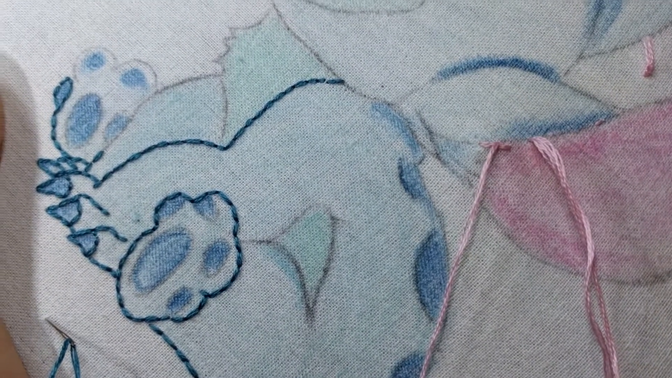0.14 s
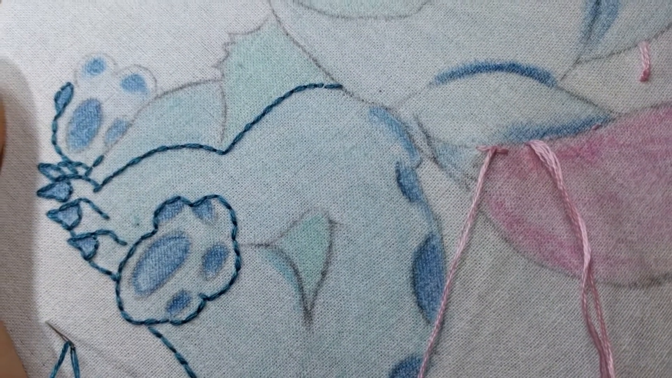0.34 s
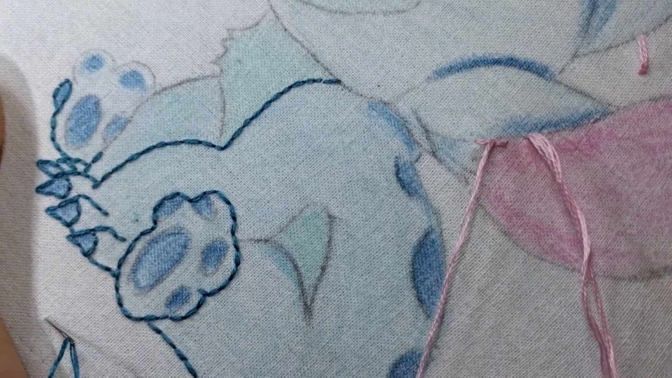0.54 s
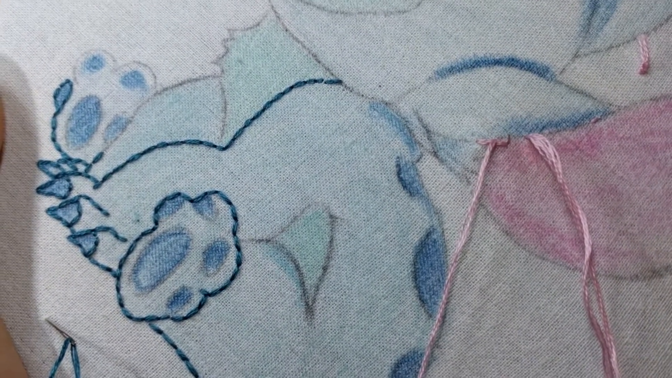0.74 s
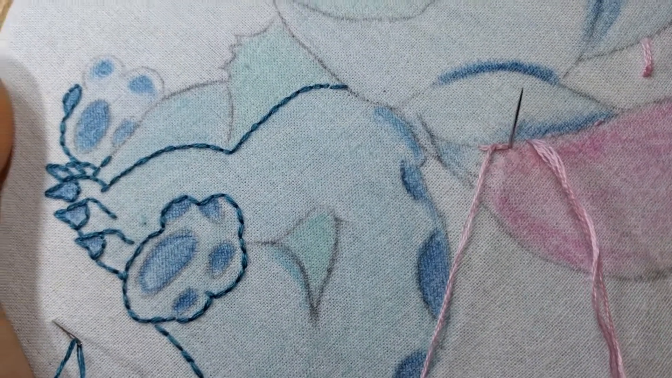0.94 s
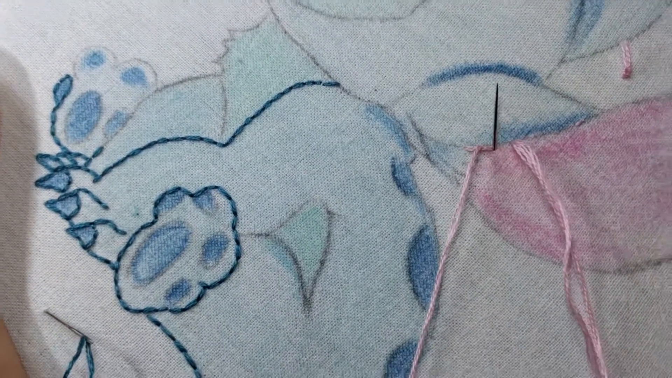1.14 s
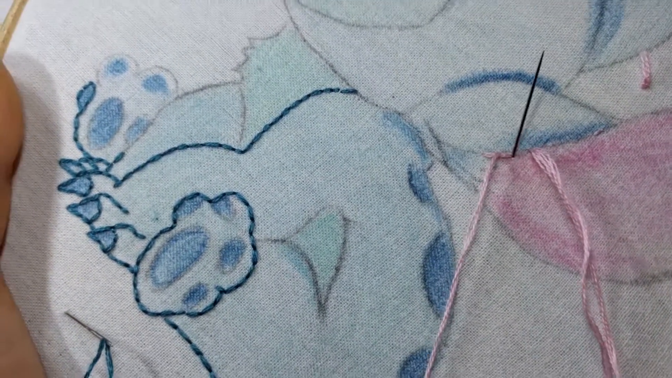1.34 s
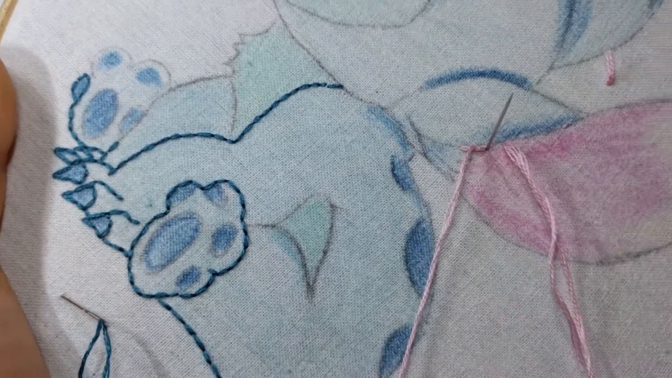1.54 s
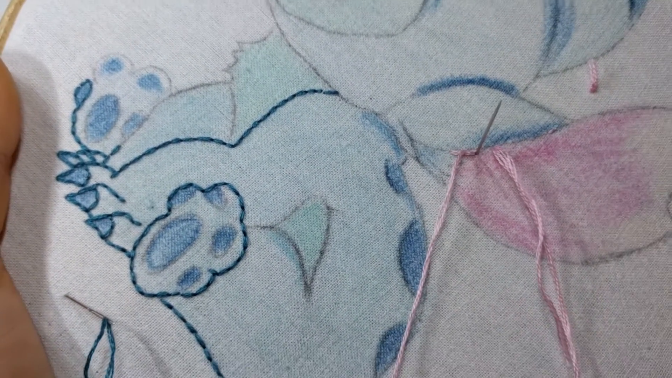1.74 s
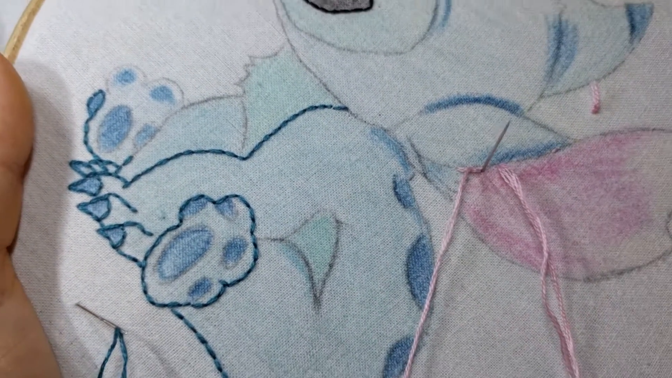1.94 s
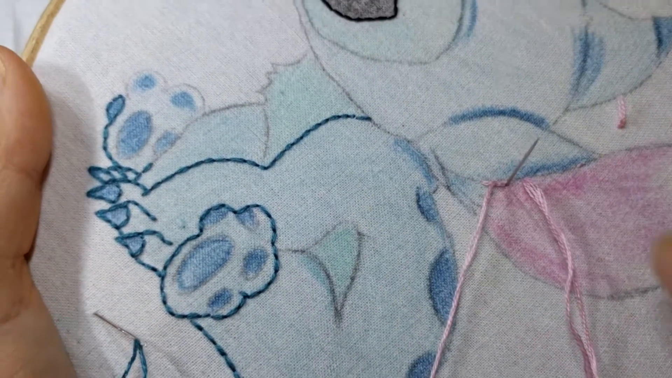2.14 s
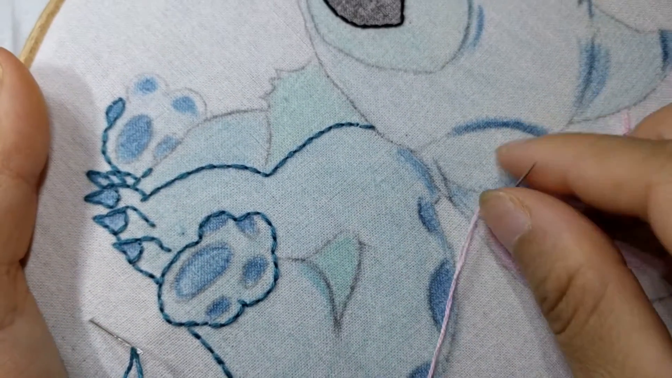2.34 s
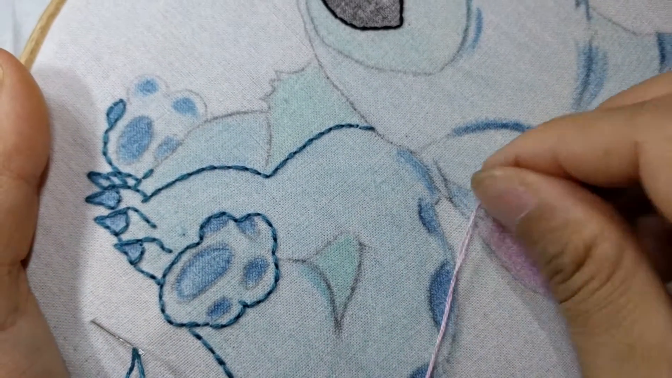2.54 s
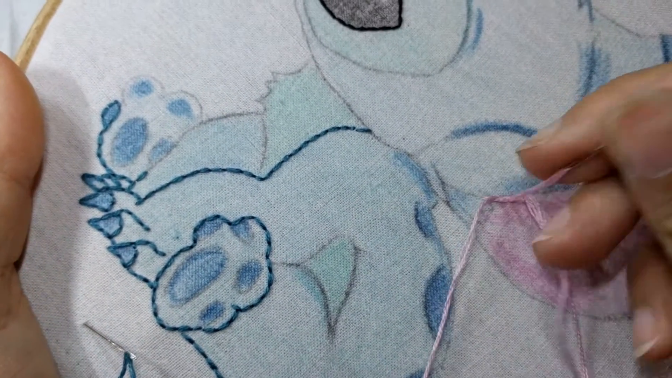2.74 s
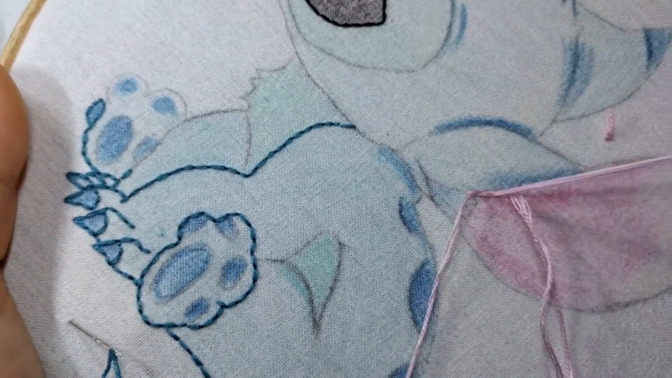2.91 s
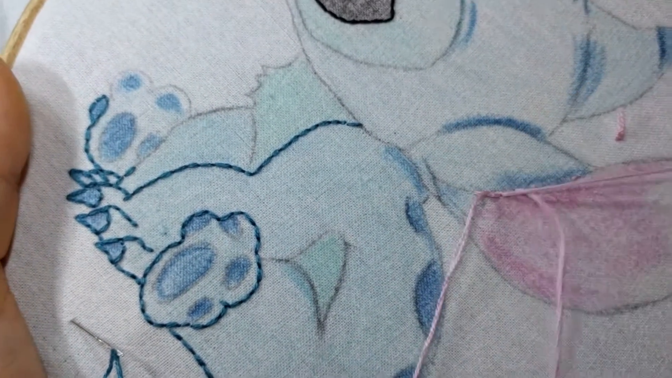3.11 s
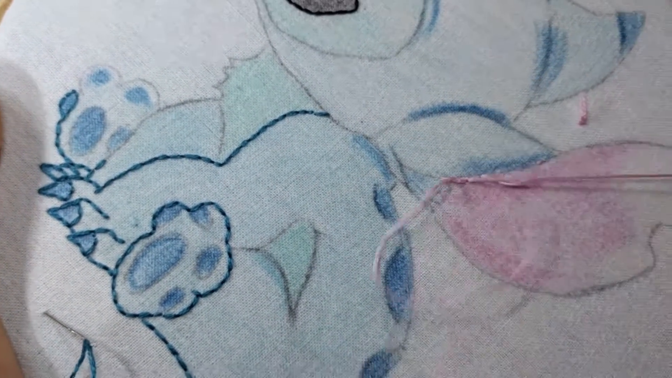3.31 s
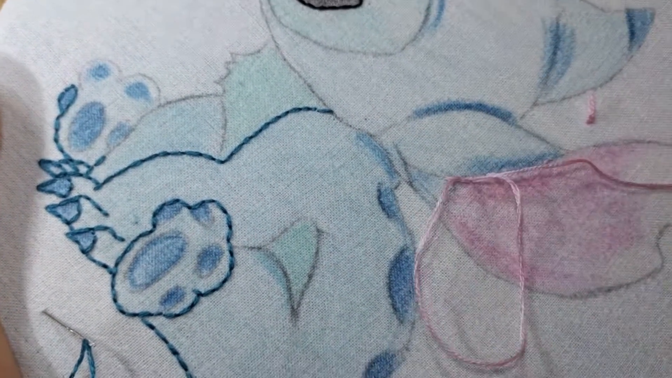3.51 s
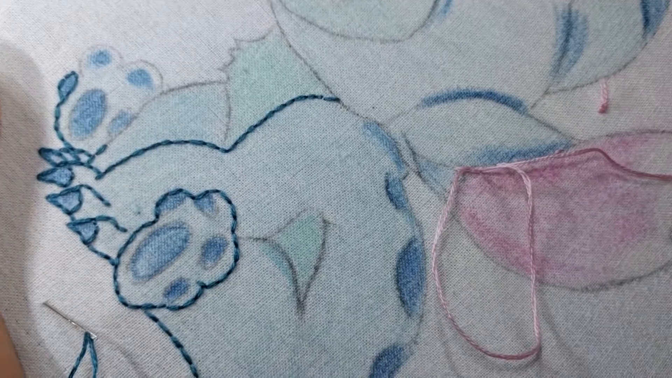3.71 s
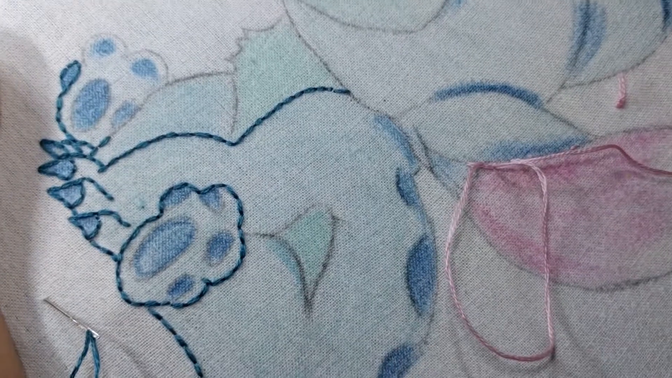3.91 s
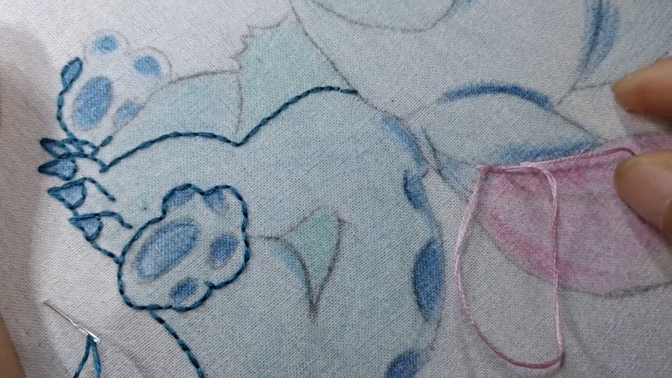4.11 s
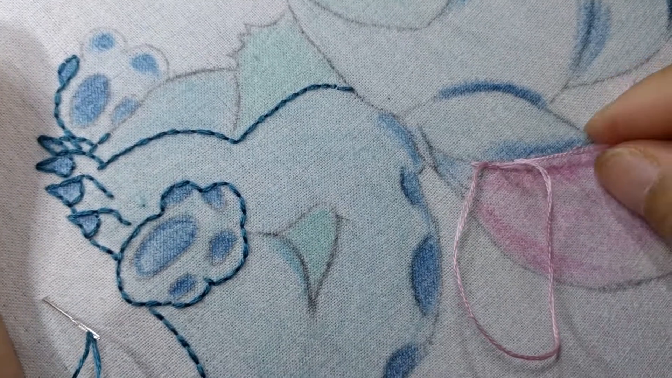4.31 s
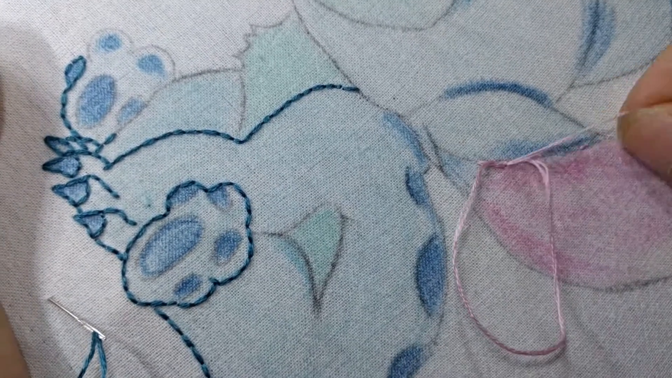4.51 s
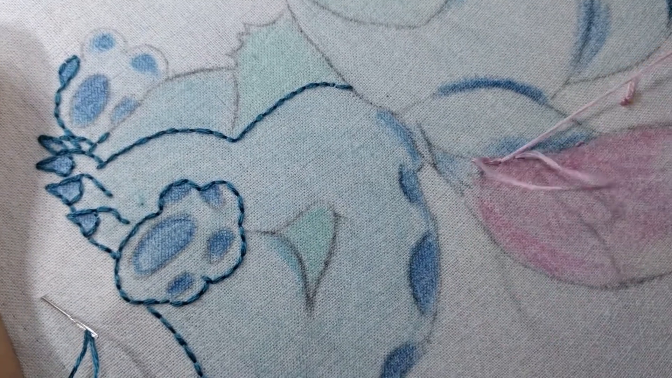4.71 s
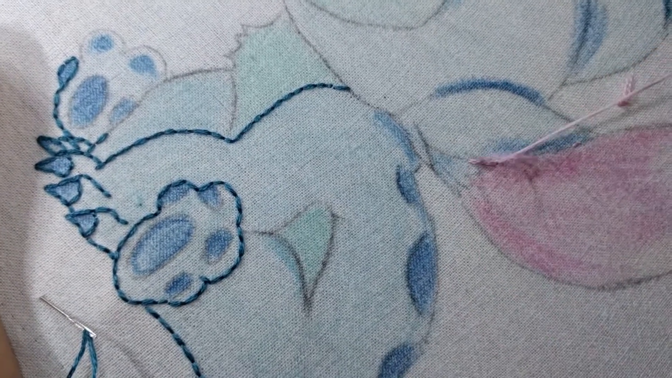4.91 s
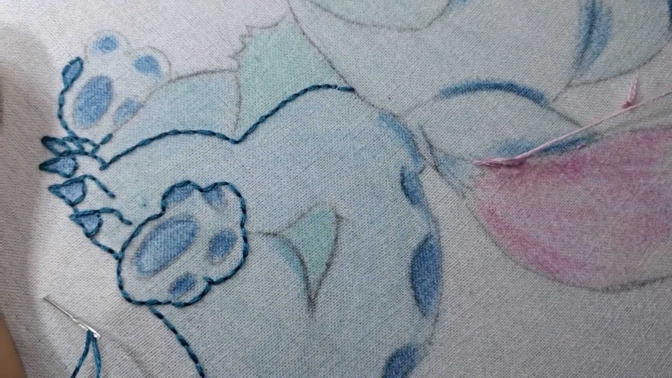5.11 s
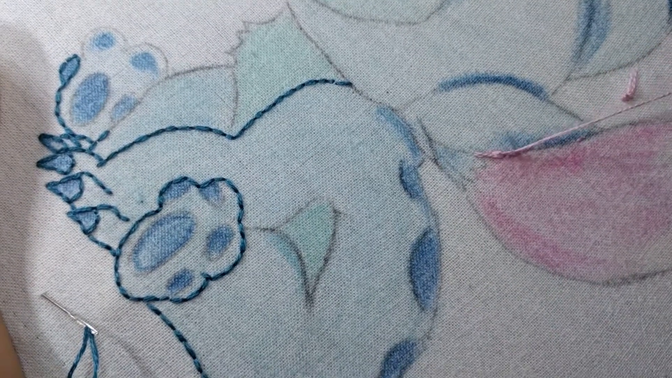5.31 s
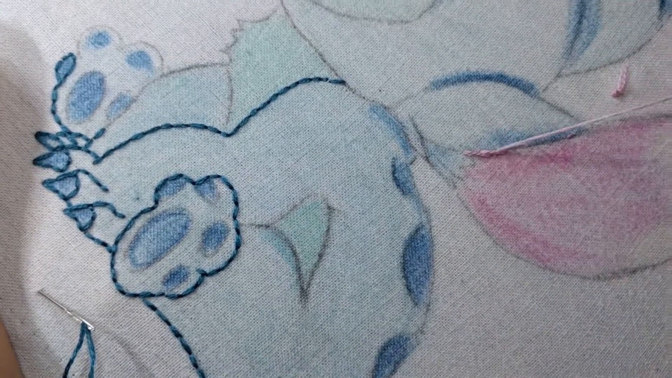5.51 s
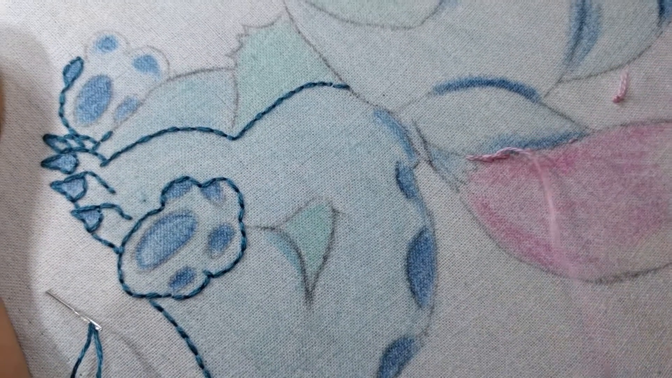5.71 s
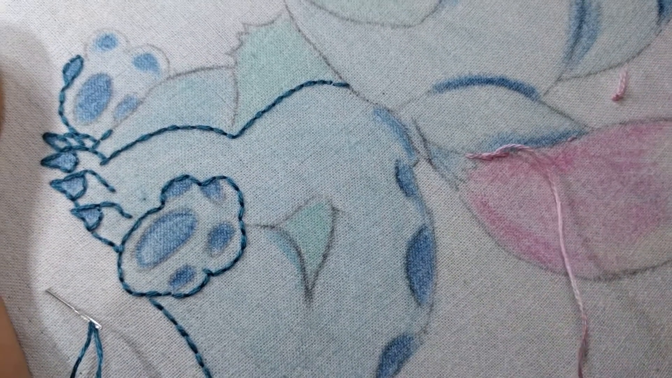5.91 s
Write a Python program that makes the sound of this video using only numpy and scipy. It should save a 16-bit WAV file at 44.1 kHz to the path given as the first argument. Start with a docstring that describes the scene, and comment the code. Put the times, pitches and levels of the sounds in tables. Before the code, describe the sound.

Hand embroidery is heard from very close, over a steady low room rumble, faint microphone hiss and a thin electrical sizzle. At 0.3 seconds a needle taps taut cotton. It pricks through with a sharp tick at about 1.1 seconds, scraping faintly until 1.8. Fingers rub and grip from 2.3 seconds, and at 2.65 the needle's eye pops through with a soft thump and a tiny rip. From 2.7 to 3.4 seconds thread is drawn through, rasping and hissing while the cloth thrums like a slack drum; it jerks tight with a brief buzz around 3 seconds, the loudest moment. Slack thread brushes the fabric near 3.7, and fingers shuffle lightly around 4.3. A second, smoother pull runs from 4.6 to 5.25 seconds, droning softly and fading, dotted with fibre ticks. One small click follows at about 6 seconds.

```python
"""Embroidery floss drawn in two pulls through cotton stretched in a hoop, heard from very close.
Its twist thrums the cloth like a slack drum, while its fibres rasp and hiss in the hole.
Ahead of the pulls, a needle pricks the cloth, scrapes through and pops its eye past the weave.
Fingers grip and shuffle in between, over a bed of low room rumble, microphone hiss and mains sizzle."""
import sys
import numpy as np
from scipy import signal
from scipy.fft import rfft, irfft, next_fast_len
from scipy.io import wavfile
from scipy.ndimage import uniform_filter1d, map_coordinates

SR = 44100
rng = np.random.default_rng(int(sys.argv[2]) if len(sys.argv) > 2 else 0)


def waveform_to_disk(signal):
    """Save audio, clipped to [-1, 1], as 16-bit WAV at the path in sys.argv[1]."""
    frames = np.transpose(np.atleast_2d(signal))
    scaled = np.clip(frames, -1, 1) * 32767
    samples = np.round(scaled).astype(np.int16)
    wavfile.write(sys.argv[1], SR, samples)


N = 266972
TIME = np.arange(N) / SR

# drum modes of the stretched cloth: f/Hz, level/dB, t60/s
CLOTH_MODES = [(61.8, 10, 0.12), (86, -2, 0.11), (111, 4.5, 0.12), (179.3, -2, 0.24), (236, -8, 0.22),
               (274, -19, 0.11)]


def floss():
    """Two pulls: the first runs doubled, jerks tight and trails off single; the second is one stroke."""
    # hand strokes by name: start/s, end/s, attack/s, release/s, ease in/dB, ease out/dB,
    # thrum/dB, rasp/dB, hiss/dB, evenness of the tugs/0-1
    strokes = { "doubled": (2.69, 2.965, .145, .003, 10.5, 8, -37.5, -37, -46.8, .15),
               "jerk": (2.975, 3.098, .012, .125, 3.5, 7, -29.5, -35.8, -46.1, .6),
               "single": (3.122, 3.375, .1, .045, 3.5, 13, -41.5, -45.2, -48.2, .15),
               "second": (4.556, 5.25, .14, .31, 8.5, 16, -35.2, -46.7, -56, .55), }
    # rasp resonances of floss and cloth, set by the free length of floss: f/Hz, width/Hz, level/dB
    doubled_rasp = [(190, 50, 0), (240, 40, -1), (345, 50, -2), (395, 55, 1), (470, 50, -6),
                    (620, 110, -15.5), (755, 35, -13), (890, 120, -16.5), (1105, 120, -15),
                    (1350, 70, -17.5), (1475, 130, -20.5), (1920, 150, -23)]
    jerk_rasp = [(345, 60, -2), (420, 80, -2), (505, 60, -4), (630, 90, -12), (810, 90, -11),
                 (930, 120, -15.5), (1160, 130, -13.5), (1450, 300, -25.5), (1920, 120, -27)]
    single_rasp = [(335, 45, -4), (400, 55, -1), (540, 110, -7), (720, 80, -14), (955, 110, -11.5),
                   (1120, 110, -14), (1335, 90, -10.5), (1470, 90, -16), (1680, 70, -20), (1910, 110, -20)]
    second_rasp = [(350, 45, -3), (405, 70, 2.5), (480, 55, .5), (630, 110, -12.5), (756, 26, -6.5),
                   (810, 28, -7.5), (865, 30, -11.5), (958, 32, -12), (1042, 30, -11.5), (1123, 90, -12),
                   (1390, 80, -15), (1500, 120, -15), (1880, 220, -20.5)]
    # resonances that colour the hiss: f/Hz, width/Hz, level/dB
    doubled_hiss = [(2440, 270, 1), (2790, 290, 1), (3400, 220, 1.5), (4000, 230, 4), (5260, 600, -5),
                    (6300, 590, .5), (8900, 600, -1), (10200, 850, 1), (12000, 1100, -3),
                    (14600, 1200, -2.5)]
    single_hiss = [(2550, 470, -1), (3430, 150, -0.5), (4050, 250, 4), (5200, 950, -1.5), (7160, 230, 1),
                   (8240, 300, 1), (8950, 450, 2), (10250, 790, -1), (13300, 500, 0), (14700, 1000, -6)]
    second_hiss = [(2600, 300, .5), (3480, 260, 1.5), (4030, 260, 4.5), (4850, 150, 3), (5380, 220, 3),
                   (6110, 220, 3.5), (7230, 220, 4.5), (8830, 380, 4), (9850, 340, 0), (13700, 600, 2.5),
                   (14800, 700, -2)]
    doubled = pull(strokes["doubled"], doubled_rasp, doubled_hiss, tilt_db=-11, twist_db=1.3, ring_db=0)
    jerk = pull(strokes["jerk"], jerk_rasp, doubled_hiss, tilt_db=-20, twist_db=2.2, ring_db=0) + buzz()
    single = pull(strokes["single"], single_rasp, single_hiss, tilt_db=-22, twist_db=1, ring_db=-1.5)
    second = pull(strokes["second"], second_rasp, second_hiss, tilt_db=-1.5, twist_db=2, ring_db=-2.5)
    return hollow(doubled + jerk + single + second)


def pull(stroke, rasp_peaks, hiss_peaks, tilt_db, twist_db, ring_db):
    """Each twist tugs at the cloth and presses the fibres harder against the weave."""
    # floss speed through the hole in each pull: t/s, rate/(twists per s)
    first_speed = [(2.70, 62), (2.85, 102), (2.94, 93), (2.99, 66), (3.04, 122), (3.08, 100), (3.13, 52),
                   (3.2, 108), (3.38, 85)]
    second_speed = [(4.56, 61), (4.63, 118), (4.72, 96), (4.87, 93), (4.95, 82), (5.03, 105), (5.08, 70),
                    (5.17, 57)]
    # thick spots in the floss that drag harder: t/s, boost/dB
    slubs = [(3.318, 2), (5.172, 6)]
    *gesture, thrum_db, rasp_db, hiss_db, evenness = stroke
    sliding, effort_db = effort(*gesture)
    slub_db = sum(db * swell(s, rise=.017, fall=.017) for s, db in slubs)
    twist_hz = np.interp(TIME, *np.transpose(first_speed + second_speed))
    turns = np.cumsum(twist_hz * np.exp(.0506 * drift(70))) / SR
    pressure = from_db(twist_db * np.cos(2 * np.pi * turns) + .77 * drift(60))
    # a gentler pull tugs more evenly, with a rounder tone
    even = np.clip(evenness * from_db(-.35 * effort_db), 0, .95)
    drum = thrum(turns, pressure, even, tilt_db + .9 * effort_db)
    body = from_db(thrum_db + .24 * effort_db) * drum
    grit = from_db(rasp_db + 1.05 * effort_db + .6 * slub_db) * rasp(pressure, rasp_peaks)
    air = from_db(hiss_db + effort_db + slub_db) * hiss(pressure, hiss_peaks, ring_db)
    return sliding * (body + snag() * (grit + air))


def effort(start, end, attack, release, ease_in_db, ease_out_db, edge_s=.02):
    """The hand leans in, holds and eases off: when the floss slides (0-1), and how hard (dB)."""
    sliding = np.clip(1 + np.minimum(TIME - start, end - TIME) / edge_s, 0, 1)
    easing_in = np.clip(1 - (TIME - start) / attack, 0, 1)
    easing_out = np.clip(1 - (end - TIME) / release, 0, 1)
    return sliding, -ease_in_db * easing_in - ease_out_db * easing_out


def thrum(turns, pressure, even, tilt_db):
    """Even tugs make the cloth drone at the twist rate; uneven ones shake all its modes."""
    drone = steady(ring(harmonics(turns, tilt_db, count=4), CLOTH_MODES), seconds=.045)
    shake = ring(pressure * slips(per_s=3500, spread_db=2), CLOTH_MODES)
    shake = signal.sosfilt(signal.butter(3, 330, fs=SR, output="sos"), shake)
    return np.sqrt(even) * drone + np.sqrt(1 - even) * steady(shake, seconds=.017)


def rasp(pressure, peaks):
    """Coarse slips ring the floss and cloth."""
    grains = pressure * slips(per_s=2700, spread_db=2)
    return steady(rolling_resonances(grains, peaks), seconds=.08)


def hiss(pressure, peaks, ring_db):
    """Fine slips make a broad hiss with a resonant layer on top."""
    # spectrum of the sliding fibres: f/Hz, density/dB
    spectrum = [(900, -30), (1700, -14), (2250, -7), (2600, 0), (4500, 0), (7500, -2), (11500, -1),
                (14800, 1), (16000, -6)]
    fine = pressure * slips(per_s=9000, spread_db=3.3)
    spiky = pressure * slips(per_s=6400, spread_db=6)
    return rms_one(colour(fine, spectrum) + from_db(ring_db) * rolling_resonances(spiky, peaks))


def rolling_resonances(x, peaks, waver_db=1.6, stray_share=.008, per_s=14):
    """As the floss rolls in the hole, its resonances waver one by one and stray in pitch together."""
    wavering = sum(resonate(x, [peak]) * from_db(waver_db * drift(20)) for peak in peaks)
    position = np.arange(N) + np.cumsum(stray_share * drift(per_s))
    return rms_one(map_coordinates(wavering, [position], order=3, mode="mirror"))


def snag(at_s=2.969, width_s=.004, depth_db=-7):
    """The floss catches for an instant and its friction ducks."""
    return from_db(depth_db * swell(at_s, width_s, width_s))


def buzz(jitter=.05, rough_db=2.5, sag_octaves_per_s=3.5):
    """Jerked tight, the floss is bowed by the weave in rough bursts that sag as the tension gives."""
    # stick-slip bursts: t/s, rise/s, fall/s, f/Hz, level/dB
    bursts = [(2.986, .011, .027, 445, -30.3), (3.046, .018, .014, 450, -36.5), (3.1, .015, .016, 350, -40),
              (3.146, .01, .03, 410, -39.5)]
    out = 0
    for s, rise, fall, hz, db in bursts:
        sag = 2 ** np.clip(sag_octaves_per_s * (s - TIME), -1, 1)
        cycles = np.cumsum(hz * sag * np.exp(jitter * drift(220))) / SR
        tone = harmonics(cycles, tilt_db=-19, count=3) * from_db(rough_db * drift(170))
        out += from_db(db) * swell(s, rise, fall) * rms_one(tone)
    return out


def hollow(x):
    """Notch out the pitches at which the stretched cloth radiates poorly."""
    # dead spots of the cloth: f/Hz, width/Hz, depth/dB
    nulls = [(302, 28, -6.5), (560, 50, -3), (1272, 110, -14), (1750, 110, -5), (2200, 170, -2.5),
             (4580, 250, -2), (6950, 200, -3), (9350, 200, -2.5), (10950, 300, -3)]
    for hz, width, db in nulls:
        band = signal.lfilter(*signal.iirpeak(hz, hz / width, fs=SR), x)
        x = x - (1 - from_db(db)) * band
    return x


def needle_slide():
    """The shaft rubs through the weave in short pushes: a midrange scrape under a bright hiss."""
    # pushes: t/s, rise/s, fall/s, scrape/dB, hiss/dB
    pushes = [(.928, .062, .045, -63.3, -55), (1.085, .075, .025, -64, -54.5),
              (1.118, .016, .03, -65, -55.5), (1.272, .055, .055, -64.5, -55.7),
              (1.395, .05, .1, -63, -57.3), (1.54, .06, .1, -64, -57.3), (1.70, .09, .07, -64.3, -56.2),
              (1.8, .06, .06, -64.7, -62)]
    # spectra of steel on cotton: f/Hz, density/dB
    scrape_colour = [(400, -6), (900, 2.5), (1600, 1), (2400, 1), (3100, 1), (3900, -6), (7000, -24)]
    hiss_colour = [(2500, -16), (4200, -7), (8000, -5.5), (11500, -4), (14000, -0.5), (16000, 1.5)]
    return rub(pushes, scrape_colour, hiss_colour)


def snaps(tick_db=7):
    """A thread slips off the steel: a tick and crack, a thump in the cloth, a ping of the needle."""
    # snaps past threads: t/s, crack/dB, t60/s, thump/dB, ping/dB
    hits = [(0.302, -43, 0.009, -82, -75), (1.0571, -39, 0.006, -72, -47), (1.0586, -34.3, .014, -66, -47),
            (2.6578, -43.5, .008, -62, -64), (6.025, -46, .009, -76, -62)]
    # spectrum of the crack: f/Hz, density/dB
    crack_colour = [(300, -12), (1200, -3), (2500, 0), (4500, -3), (7000, 1.5), (9500, 3.5), (12000, 4.5),
                    (14800, 4.5), (16000, -2)]
    # modes of the needle: f/Hz, level/dB, t60/s
    needle_modes = [(2350, 1, .007), (2990, 0, 0.013), (5250, 4, 0.016), (5970, -5, 0.012),
                    (9570, 5, 0.013), (10450, 12, 0.018), (11500, 4, .012)]
    burst, tick, thump, ping = np.zeros((4, N))
    for s, crack_db, t60, thump_db, ping_db in hits:
        at = round(s * SR)
        burst[at:] += from_db(crack_db - 60 * np.minimum(TIME[:N - at] / t60, 10))
        tick[at], thump[at], ping[at] = from_db([crack_db + tick_db, thump_db, ping_db])
    crack = colour(tick + burst * rng.standard_normal(N), crack_colour)
    return crack + ring(thump, CLOTH_MODES) + ring(ping, needle_modes)


def taps():
    """The needle's tip, later a fingertip, taps a short dry ring out of the taut cloth."""
    # contacts: t/s, level/dB
    hits = [(.3024, -48), (4.239, -58)]
    # modes of the tapped cloth: f/Hz, level/dB, t60/s
    modes = [(580, 1, .012), (830, -1, .014), (1100, 0, .012), (1500, 1.5, .014), (1900, -4, .014),
             (2850, -8, .01), (3250, -8, .012)]
    force = np.zeros(N)
    for s, db in hits:
        force[round(s * SR)] = from_db(db)
    return ring(force, modes)


def bumps(knock_db=35, ring_db=-5.5):
    """Soft pushes thump the cloth; quick ones also knock and ring its higher modes."""
    # tip and eye break through, the floss jerks, a finger lands: t/s, push/dB, contact/s
    pushes = [(1.0586, -51, .0008), (2.6399, -32.5, 0.0083), (2.6577, -31.8, 0.00084), (2.758, -36, .007),
              (2.9748, -36.5, 0.004), (2.990, -35.5, .004), (3.068, -34.5, .006), (3.098, -35.5, .006),
              (3.298, -44, .007), (4.2383, -54, .0009)]
    # higher modes of the cloth: f/Hz, level/dB, t60/s
    high_modes = [(335, 2, .11), (395, -3, .1), (490, -5, .06), (756, -10, .05), (945, -7, .04),
                  (1116, -11, .04)]
    force = np.zeros(N)
    for s, push_db, contact in pushes:
        push = np.maximum(1 - np.abs(2 * (TIME - s) / contact - 1), 0)
        force += from_db(push_db) * push / push.sum()
    knock = resonate(force, [(230, 110, 3), (359, 180, 0), (900, 850, -4.5), (3200, 4400, -10)])
    thump = ring(force, CLOTH_MODES)
    return thump + from_db(knock_db) * knock + from_db(ring_db) * ring(force, high_modes)


def creaks():
    """The shaft creaks as it slides on through the hole."""
    # creaks: t/s, rise/s, fall/s, level/dB
    bursts = [(1.083, .005, .012, -60), (1.111, .004, .004, -56), (1.121, .005, .007, -56)]
    # their resonances: f/Hz, width/Hz, level/dB
    peaks = [(1750, 700, -11), (2400, 400, -8), (3130, 300, 3), (7300, 1200, -9)]
    return crackle(bursts, peaks, per_s=900)


def rip():
    """Fibres tear crisply as the eye bursts through."""
    # the tear: t/s, rise/s, fall/s, level/dB
    bursts = [(2.658, .0015, .009, -50)]
    # its resonances: f/Hz, width/Hz, level/dB
    peaks = [(1550, 400, -1), (2500, 700, -2), (3300, 500, -2), (4100, 500, 2)]
    return crackle(bursts, peaks, per_s=2500)


def catches(rise_s=.001, fall_s=.0022):
    """Single fibres catch in the weave and let go with a tick."""
    # catches: t/s, level/dB
    ticks = [(2.3224, -55), (2.838, -45), (3.553, -59), (4.653, -55), (4.865, -52), (4.9925, -55),
             (5.013, -55.5), (5.0914, -53), (5.4004, -60.5), (5.7215, -62)]
    # their spectrum: f/Hz, density/dB
    spectrum = [(1200, -10), (2800, 1), (5000, 0), (9000, 0), (15000, -5)]
    return rub([(s, rise_s, fall_s, db) for s, db in ticks], spectrum)


def handling():
    """Fingers grip needle and floss and shuffle dully on the cloth; slack floss brushes over it."""
    # light rubs: t/s, rise/s, fall/s, level/dB
    grips = [(2.322, .008, .025, -55.5), (2.375, .03, .13, -58), (2.592, .045, .03, -53),
             (2.648, .03, .035, -49), (4.21, .06, .07, -62.5), (4.38, .025, .06, -61),
             (4.555, .032, .07, -56)]
    shuffles = [(2.35, .03, .04, -64), (4.25, .025, .025, -63)]
    brushes = [(3.38, .015, .025, -55), (3.52, .15, .1, -66), (3.68, .052, .028, -52.8)]
    # their spectra: f/Hz, density/dB
    grip_colour = [(900, 0), (1600, -4.5), (3000, -5.5), (4000, -2), (5500, -6), (9000, -5), (12500, -4),
                   (16000, 0)]
    shuffle_colour = [(300, -12), (600, -6), (900, 0), (1100, -4), (1400, -14), (3000, -26), (6000, -44)]
    brush_colour = [(1500, -28), (4500, -11), (8000, -11), (11500, -4.5), (14500, 0), (16000, 0)]
    return rub(grips, grip_colour) + rub(shuffles, shuffle_colour) + rub(brushes, brush_colour)


def room_tone(rumble_db=-48.5, hiss_db=-65.9):
    """Steady rumble in a few room modes, with the microphone's faint hiss above it."""
    # room modes: f/Hz, width/Hz, level/dB
    modes = [(69, 37, -4), (130.5, 42, -5), (229.3, 31, -3), (486.4, 20.4, -1.5), (810, 60, -11),
             (960, 100, -7)]
    # spectra of room and microphone noise: f/Hz, density/dB
    rumble_colour = [(15, -55), (25, -31), (39, -2), (70, -3), (128, -4), (188, -11), (226, -9),
                     (326, -15.5), (391, -20), (445, -22), (479, -18), (642, -25.5), (2000, -40),
                     (2600, -77), (4400, -120)]
    mic_colour = [(1200, -11), (2400, -4), (4300, -4.8), (7000, -7.5), (11000, -7.6), (13000, -5),
                  (15000, -4), (16000, -8)]
    air, circuit = rng.standard_normal((2, N))
    rumble = rms_one(colour(air + resonate(air, modes), rumble_colour))
    return from_db(rumble_db) * rumble + from_db(hiss_db) * colour(circuit, mic_colour)


def sizzle(mains_hz=50):
    """A thin, very high electrical hiss flares twice in every mains cycle."""
    # flares: t in the cycle/s, half length/s, level/dB
    flares = [(.0012, .00105, -65.5), (.0184, .00078, -64)]
    # their spectrum: f/Hz, density/dB
    spectrum = [(6000, -22), (10500, -16), (12500, -2), (14000, 0), (15200, 0), (16000, -6)]
    level = 0
    for s, half, db in flares:
        offset_s = (((TIME - s) * mains_hz + .5) % 1 - .5) / mains_hz
        level += from_db(db) * np.exp(-(offset_s / half) ** 2)
    return level * colour(rng.standard_normal(N), spectrum)


def rub(strokes, *spectra):
    """Light sliding on cotton: swells of fine grains, one spectrum for each level column."""
    power = sum(np.outer(from_db(dbs), swell(s, rise, fall)) ** 2 for s, rise, fall, *dbs in strokes)
    levels = np.sqrt(power) * from_db(drift(70))
    textures = [colour(slips(per_s=12000, spread_db=4), spectrum) for spectrum in spectra]
    return sum(level * texture for level, texture in zip(levels, textures))


def crackle(bursts, peaks, per_s):
    """Short runs of coarse slips ring a few resonances."""
    level = sum(from_db(db) * swell(s, rise, fall) for s, rise, fall, db in bursts)
    return level * steady(resonate(slips(per_s, spread_db=3), peaks), seconds=.012)


def slips(per_s, spread_db):
    """Fibres catch and let go at random: tiny clicks of uneven size."""
    sizes = from_db(spread_db * np.minimum(rng.exponential(1, N), 4))
    return rms_one(sizes * rng.choice([-1, 1], N) * (rng.random(N) < per_s / SR))


def harmonics(cycles, tilt_db, count):
    """A harmonic tone whose partials slope by tilt_db per octave."""
    return sum(from_db(tilt_db * np.log2(k)) * np.sin(2 * np.pi * k * cycles)
               for k in range(1, count + 1))


def ring(force, modes):
    """A force sets decaying modes ringing: f/Hz, level/dB, t60/s."""
    out = 0
    for hz, db, t60 in modes:
        radius, angle = np.exp(-np.log(1000) / (t60 * SR)), 2 * np.pi * hz / SR
        feedback = [1, -2 * radius * np.cos(angle), radius * radius]
        out += from_db(db) * signal.lfilter([.5, 0, -.5], feedback, force + 1e-18)
    return out


def resonate(x, peaks):
    """Parallel resonances with steep skirts: f/Hz, width/Hz, level/dB."""
    out = 0
    for hz, width, db in peaks:
        edges = np.clip([hz - width / 2, hz + width / 2], 10, .45 * SR)
        out += from_db(db) * signal.sosfilt(signal.butter(2, edges, "band", fs=SR, output="sos"), x)
    return out


def colour(x, spectrum):
    """Minimum-phase EQ with unit power gain, following a curve: f/Hz, density/dB."""
    size = 2 * next_fast_len(N)
    hz, db = np.transpose(spectrum)
    bins = np.maximum(np.arange(size // 2 + 1) * SR / size, 1)
    gain = rms_one(from_db(np.interp(np.log(bins), np.log(hz), db)))
    cepstrum = irfft(np.log(gain))
    cepstrum[1:size // 2] *= 2   # folded forward, so nothing rings ahead of a click
    cepstrum[size // 2 + 1:] = 0
    return irfft(rfft(x, size) * np.exp(rfft(cepstrum)))[:N]


def steady(x, seconds):
    """Ride the slow level flat, so that an envelope alone sets it."""
    size = max(int(seconds * SR), 2)
    return x / np.sqrt(uniform_filter1d(uniform_filter1d(x * x, size), size) + 1e-12)


def swell(s, rise, fall):
    """A rounded rise to a peak at time s, and a rounded fall."""
    return np.exp(-((TIME - s) / np.where(TIME < s, rise, fall)) ** 2)


def drift(per_s):
    """Random wander at unit rms, gliding to per_s new values a second."""
    knots = rng.standard_normal(N // 8)
    return rms_one(np.interp(TIME * per_s, np.arange(len(knots)), knots))


def rms_one(x):
    """Scale to unit rms."""
    return x / np.sqrt(np.mean(x ** 2) + 1e-20)


def from_db(db):
    """Decibels to gain."""
    return 10 ** (np.asarray(db) / 20)


def scene():
    """Floss, needle and fingers close to one microphone, over the room tone."""
    needle = needle_slide() + snaps() + taps() + bumps()
    fibres = creaks() + rip() + catches()
    return (needle + fibres + handling() + floss() + room_tone() + sizzle())[None]


def record(dry, low_cut_hz=42, high_cut_hz=15900):
    """The microphone drops the deepest bass; the top is cut steeply."""
    thin = signal.sosfilt(signal.butter(6, low_cut_hz, "high", fs=SR, output="sos"), dry)
    return signal.sosfilt(signal.ellip(12, .1, 80, high_cut_hz, fs=SR, output="sos"), thin)


dry = scene()
out = record(dry)
waveform_to_disk(out)
```